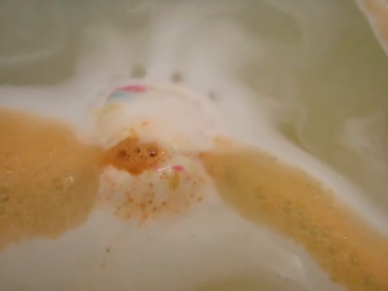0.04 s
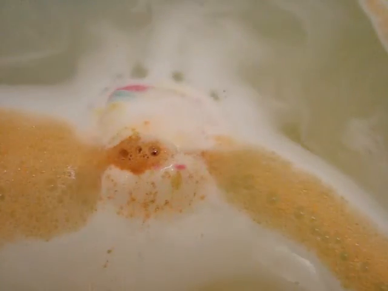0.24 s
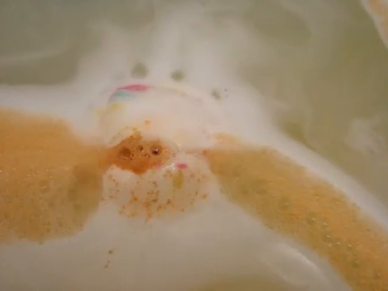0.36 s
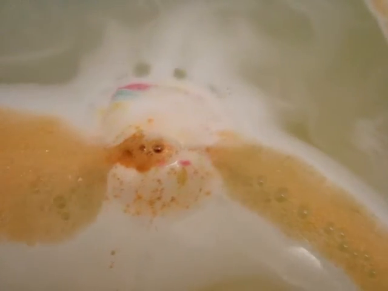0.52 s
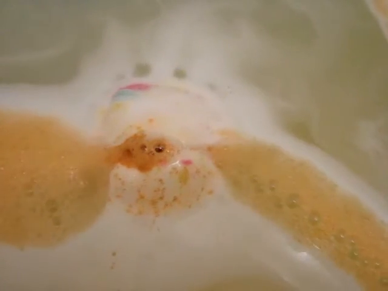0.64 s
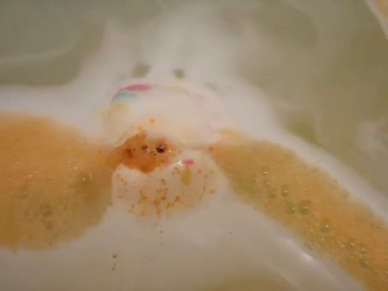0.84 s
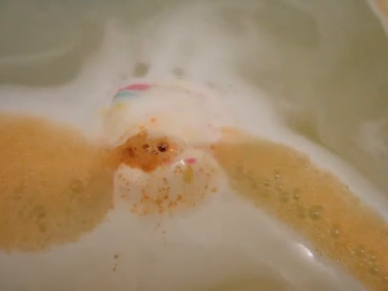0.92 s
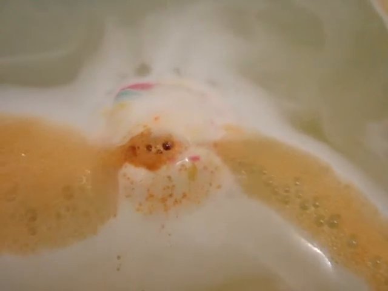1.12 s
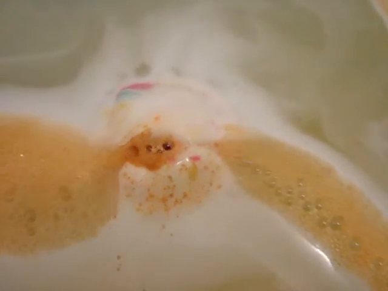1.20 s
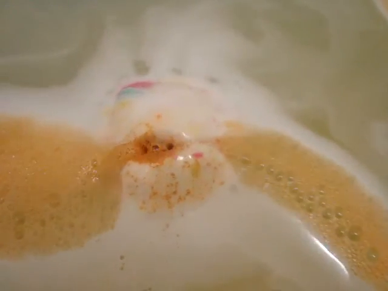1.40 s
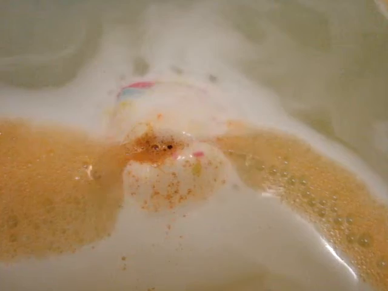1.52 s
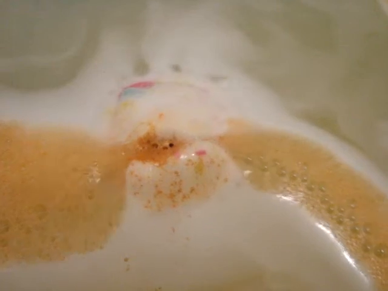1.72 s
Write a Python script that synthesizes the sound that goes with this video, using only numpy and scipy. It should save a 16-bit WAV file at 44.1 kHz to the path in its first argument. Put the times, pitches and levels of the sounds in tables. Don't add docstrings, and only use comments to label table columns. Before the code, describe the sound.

A bath bomb fizzes softly in water, with one hard plastic tap near the start.

```python
import sys
import numpy as np
from scipy import signal
from scipy.fft import rfft, irfft, next_fast_len
from scipy.io import wavfile
from scipy.ndimage import uniform_filter1d, map_coordinates

SR = 44100
rng = np.random.default_rng(int(sys.argv[2]) if len(sys.argv) > 2 else 0)


def put_to_file(sound):
    columns = np.atleast_2d(sound).T
    safe = np.clip(columns, -1, 1)
    whole_steps = np.round(safe * 32767)
    wavfile.write(sys.argv[1], SR, whole_steps.astype(np.int16))


def decibels_to_gain(level_db):
    exponent = np.asarray(level_db, float) / 20
    return 10 ** exponent


N = 77175

# start_s, peak_db
CONTACTS = [
    (.2369, -35),
    (.2392, -16),
    (.2440, -36),
    (.2522, -34),
    (.2547, -31),
    (.2625, -36),
    (.2715, -35),
    (.2788, -40),
]


def unit(x):
    return x / np.sqrt(np.mean(x ** 2) + 1e-20)


def along(hz, f, v):
    return np.interp(np.log(hz + 1), np.log(np.asarray(f) + 1), v)


def wobble(rate):
    knots = rng.standard_normal(int(N * rate / SR) + 4)
    return map_coordinates(knots, [np.arange(N) * rate / SR])


def filtered(x, response):
    m = next_fast_len(N + 8192)
    gain = response(np.fft.rfftfreq(m, 1 / SR))
    return irfft(rfft(x, m) * gain, m)[..., :N]


def bubbles(start_s, peak_db, pitch_hz, cycles, size=160):
    t = np.arange(size) / SR
    turns = np.asarray(pitch_hz)[:, None] * t
    envelope = np.exp(-turns / cycles) * (1 - np.exp(-2 * turns))
    grain = decibels_to_gain(peak_db)[:, None] * np.sin(2 * np.pi * turns) * envelope
    at = (np.asarray(start_s) * SR).astype(int)[:, None] + np.arange(size)
    return np.bincount(at.ravel(), grain.ravel(), N + size)[:N]


def hiss():
    # freq_hz, level_db
    hiss_colour = [(25, -19.5), (60, -19), (210, -2.5), (580, -2.5), (1150, -5.5), (2000, -9), (5500, -10),
                   (10000, -12.5)]
    # freq_hz, depth_db
    patch_depth = [(300, 0.6), (800, 0.5), (2000, .5)]
    level_db, drift_db = -52.5, 0.15
    hz, _, z = signal.stft(rng.standard_normal(N + 512), SR, nperseg=256)
    patches = uniform_filter1d(rng.standard_normal(z.shape), 5, 0)
    patches = unit(uniform_filter1d(patches, 8, 1))
    patch_db = along(hz, *np.transpose(patch_depth))[:, None] * patches
    noise = signal.istft(z * decibels_to_gain(patch_db), nperseg=256)[1][:N]
    coloured = filtered(noise, lambda hz: decibels_to_gain(along(hz, *np.transpose(hiss_colour))))
    return decibels_to_gain(level_db + drift_db * wobble(4.5)) * unit(coloured)


def room():
    # freq_hz, density_db (per Hz)
    tile_colour = [(900, -26), (1600, -9), (2400, -0.5), (3300, -12.5), (4300, 1), (5300, 0.5), (6500, -6),
                   (8000, -6.5), (9500, -23)]
    # freq_hz, build_s, t60_s
    answer_times = [(1500, .002, 0.2), (2500, 0.0032, 0.2), (3500, 0.0082, 0.42), (4300, 0.0057, 0.33),
                    (5300, 0.041, 0.23), (6200, 0.027, 0.22), (6950, 0.0074, 0.19), (10100, 0.011, .15)]
    level_db, delay_s = -44, 0.004
    hz, t, z = signal.stft(rng.standard_normal(SR // 2), SR, nperseg=128)
    f, build_s, t60_s = np.transpose(answer_times)
    build = (1 - np.exp(-t / along(hz, f, build_s)[:, None])) ** 3
    shape = build * decibels_to_gain(-60 * t / along(hz, f, t60_s)[:, None])
    shape = shape / shape.max(axis=1, keepdims=True)
    tail = signal.istft(z * shape, SR, nperseg=128)[1]
    blow_s = CONTACTS[1][0]
    tail = np.pad(tail, (round((blow_s + delay_s) * SR), N))[:N]

    def colour(hz):
        return decibels_to_gain(along(hz, *np.transpose(tile_colour)))

    colour_rms = np.sqrt(np.mean(colour(np.linspace(0, SR / 2, 500)) ** 2))
    return decibels_to_gain(level_db) * filtered(tail, colour) / colour_rms


def fizz():
    # start_s, peak_db, pitch_hz
    pops = [
        (0.2548, -36, 6200),
        (0.688, -45, 3700),
        (.7245, -43, 5000),
        (0.736, -47, 4420),
        (0.6934, -33.5, 8600),
        (0.7075, -40, 5500),
        (.7165, -39, 5000),
        (.7418, -38.5, 5200),
        (0.743, -39, 8100),
        (0.9648, -36.5, 5760),
    ]
    bursts_per_s, level_db, surge_db = 900, -66, 3
    pitch_hz, pitch_spread = 5500, 0.46
    size_db = 3.5
    count = int(bursts_per_s * N / SR)
    u, g = rng.random((count, 2)), rng.standard_normal(count)
    pitches = np.clip(pitch_hz * np.exp(pitch_spread * g), 800, 9800)
    strengths_db = -size_db * np.log(1 - 0.98 * u[:, 1])
    dense = bubbles(u[:, 0] * N / SR, strengths_db, pitches, cycles=2.9)
    surges = decibels_to_gain(level_db + surge_db * wobble(6.57))
    return surges * unit(dense) + bubbles(*np.transpose(pops), cycles=2)


def tap():
    # freq_hz, level_db, t60_s
    plastic = [(1483, -18.5, 0.033), (1750, -22, 0.024), (2366, -10, .016), (2571, -9, 0.027),
               (3386, -7.5, 0.023), (3700, -8, 0.023), (4096, 1, 0.017), (4570, 4, 0.0071),
               (4916, -3, 0.027), (5320, 2, 0.02), (5830, -2.5, 0.0098), (6500, -5.5, 0.017),
               (7170, -3.5, 0.011), (7620, -29, .008)]
    level_db, scatter_db, rise_s = -7.5, 2, 0.00007
    low_hz, high_hz = 1500, 7600
    out, t = np.zeros(N), np.arange(2000) / SR
    scatter = rng.standard_normal((len(CONTACTS), len(plastic)))
    for (start_s, peak_db), own in zip(CONTACTS, scatter):
        late = np.maximum(t - start_s * SR % 1 / SR, 0)
        ring = 0
        for (hz, mode_db, t60_s), g in zip(plastic, own):
            decay = decibels_to_gain(mode_db + scatter_db * g - 60 * late / t60_s)
            ring = ring + decay * np.sin(2 * np.pi * hz * late)
        rise = 1 - np.exp(-(late / rise_s) ** 2)
        out[int(start_s * SR):][:len(t)] -= decibels_to_gain(peak_db + level_db) * ring * rise
    band = signal.butter(3, [low_hz, high_hz], "band", fs=SR, output="sos")
    return signal.sosfilt(band, out)


def scene():
    return np.tile(hiss() + fizz() + tap() + room(), (2, 1))


def holes(x):
    # freq_hz, share (0 to 1)
    hole_share = [(2500, 0), (4500, .02), (5500, .06), (9000, .08), (10000, .2)]
    hz, t, z = signal.stft(x, SR, nperseg=512)
    chance = rng.random((len(hz) // 3 + 1, len(t) // 3 + 1))
    chance = chance.repeat(3, axis=0).repeat(3, axis=1)
    kept = chance[:len(hz), :len(t)] > along(hz, *np.transpose(hole_share))[:, None]
    return signal.istft(z * kept, SR, nperseg=512)[1][..., :N]


def starve(x):
    # start_s, end_s, low_hz, high_hz
    starved = [(.2025, .236, 2650, 9350), (.226, .2375, 8400, 11000), (.2435, .277, 4700, 5800),
               (.2445, .2525, 5700, 6200), (.256, .277, 5700, 6250), (.2415, .276, 7200, 8400),
               (.2555, .262, 2000, 3000), (.2575, .262, 3000, 4700), (.256, .2605, 6200, 10000),
               (.270, .277, 6200, 7300), (.260, .274, 3100, 3400), (.670, .687, 8300, 11000),
               (.684, .692, 9500, 11000), (.677, .686, 6800, 7200), (.696, .706, 8900, 11000),
               (.698, .705, 6300, 7700), (.831, .839, 6800, 8800), (.868, .876, 9000, 11000),
               (.139, .165, 5150, 5400)]
    left_db, fade_s, edge_hz = -45, 0.0025, 100
    t = np.arange(N) / SR
    for start_s, end_s, low_hz, high_hz in starved:
        gate = np.clip(np.minimum(t - start_s, end_s - t) / fade_s, 0, 1)
        fade = (1 - np.cos(np.pi * gate)) / 2
        band = filtered(x, lambda hz: np.clip(np.minimum(hz - low_hz, high_hz - hz) / edge_hz + 0.5, 0, 1))
        x = x - (1 - decibels_to_gain(left_db)) * fade * band
    return x


def top_cut(x):
    return signal.sosfilt(signal.butter(12, 10060, fs=SR, output="sos"), x)


def record(dry):
    top_hz, edge_hz = 10050, 120
    mix = starve(holes(dry))
    mix = filtered(mix, lambda hz: np.clip((top_hz - hz) / edge_hz + 0.5, 0, 1))
    return top_cut(mix)


dry = scene()
out = record(dry)
put_to_file(out)
```